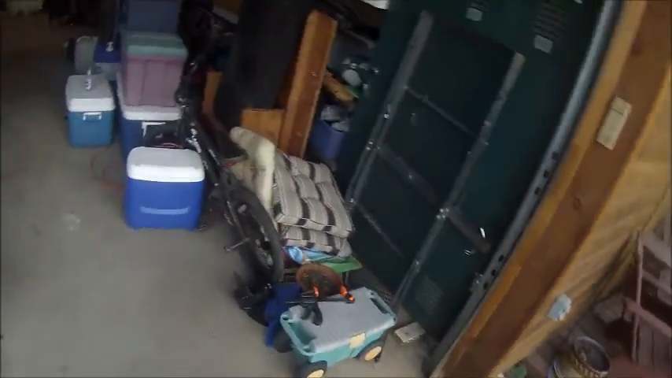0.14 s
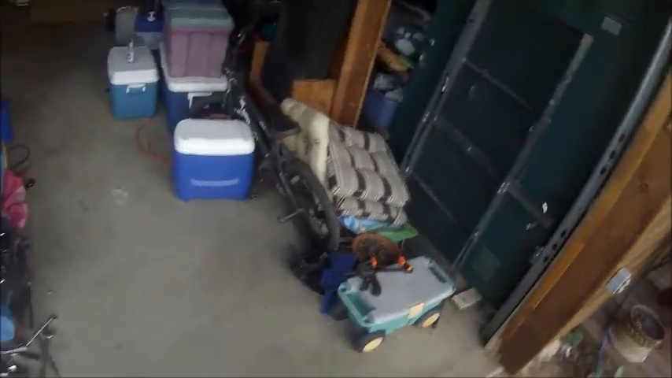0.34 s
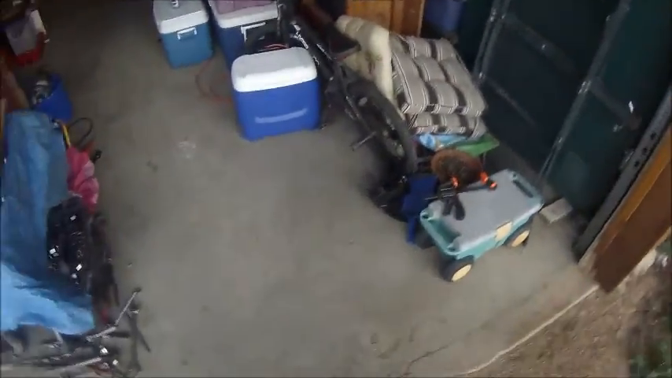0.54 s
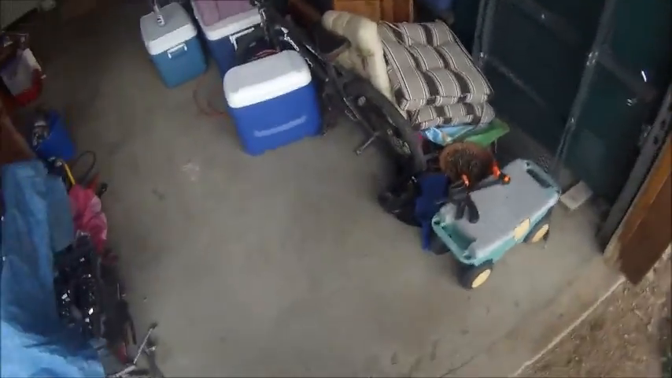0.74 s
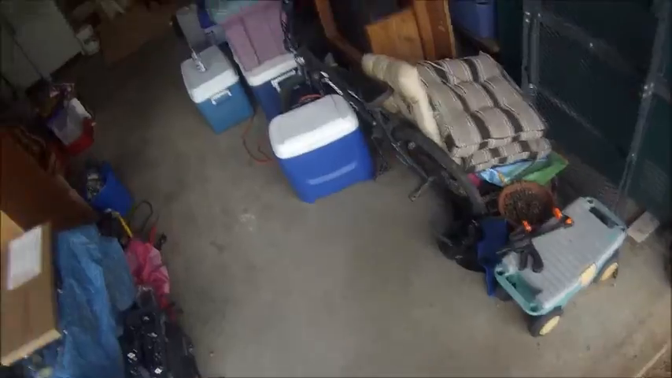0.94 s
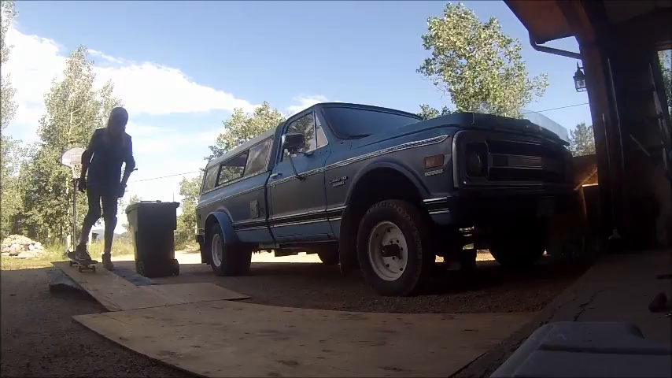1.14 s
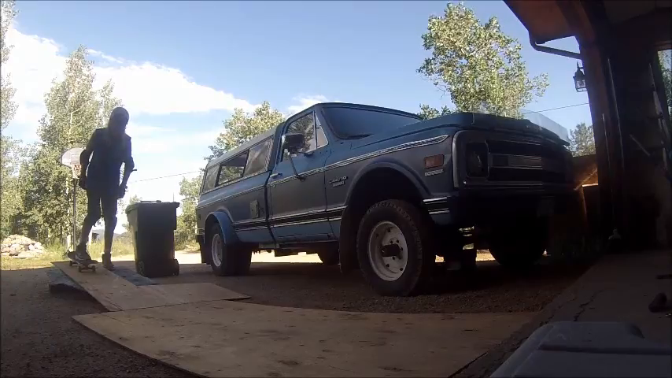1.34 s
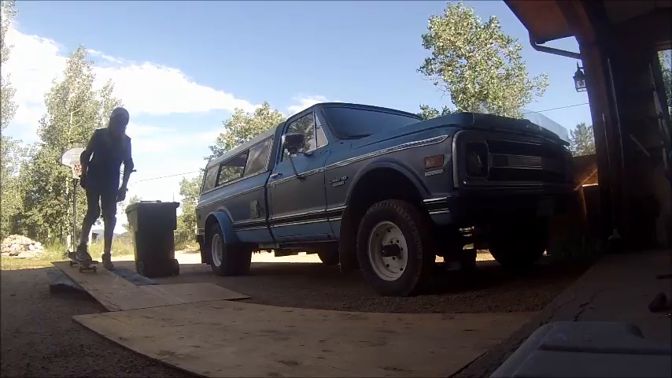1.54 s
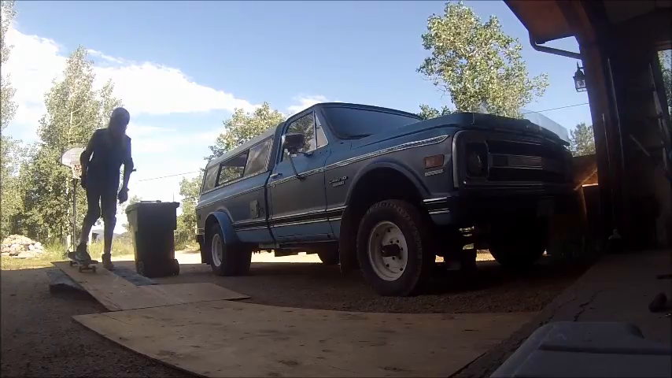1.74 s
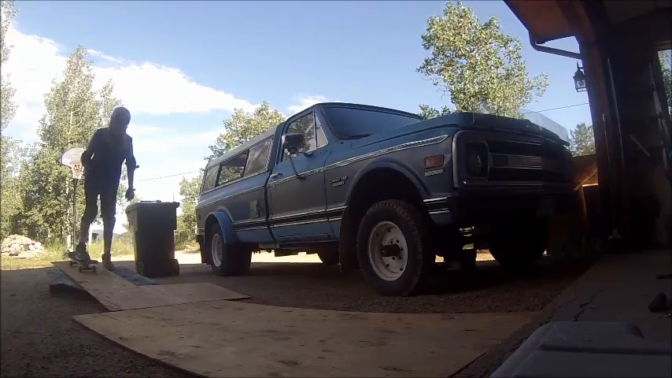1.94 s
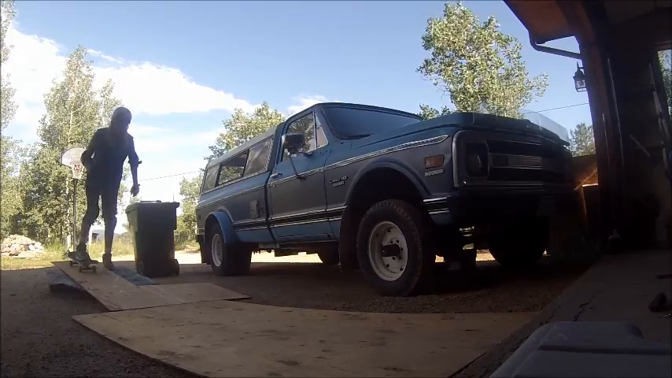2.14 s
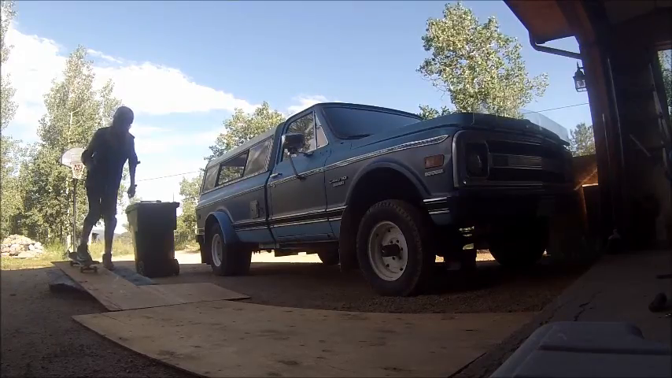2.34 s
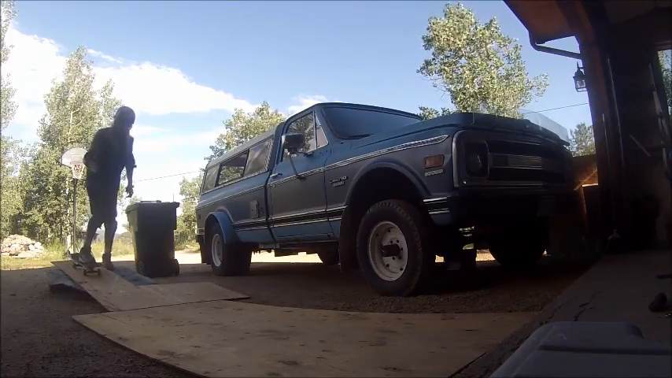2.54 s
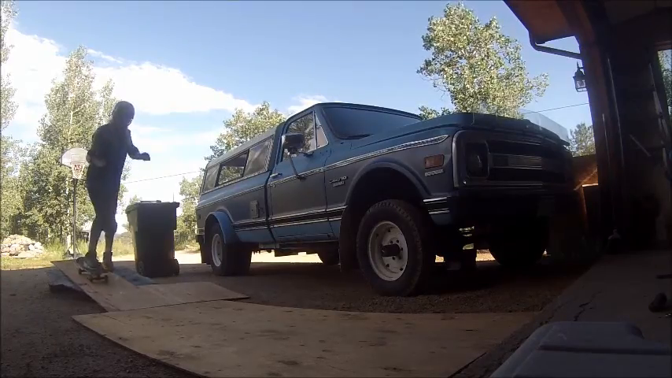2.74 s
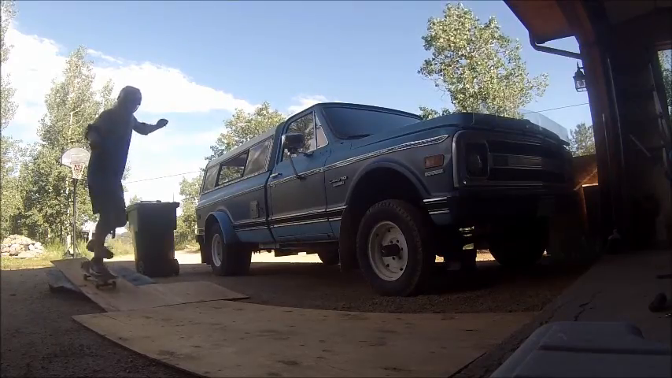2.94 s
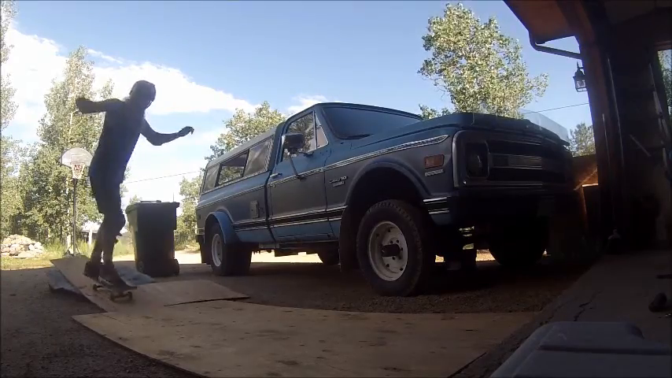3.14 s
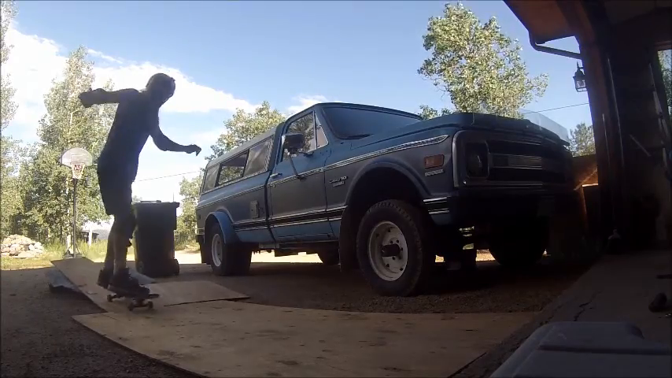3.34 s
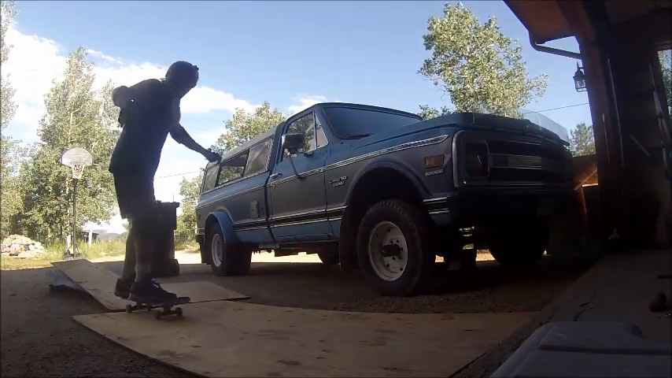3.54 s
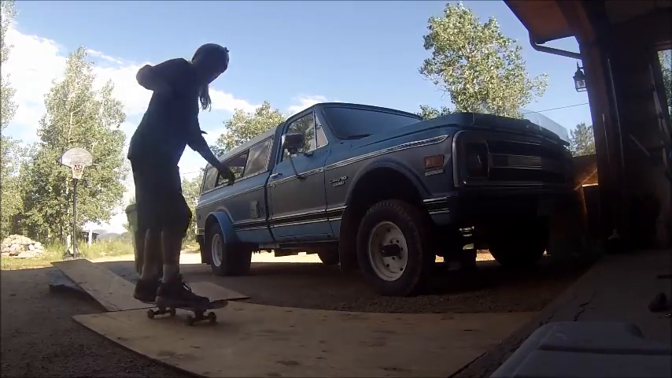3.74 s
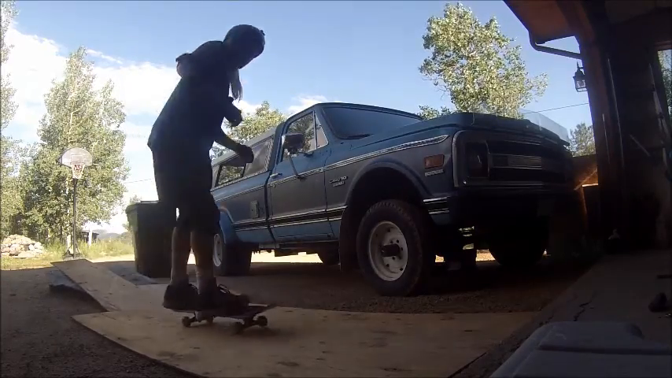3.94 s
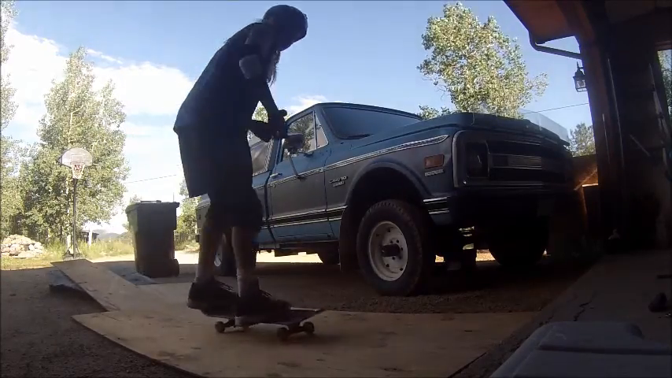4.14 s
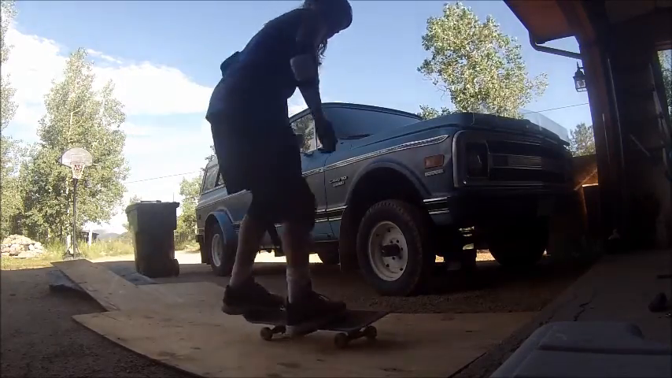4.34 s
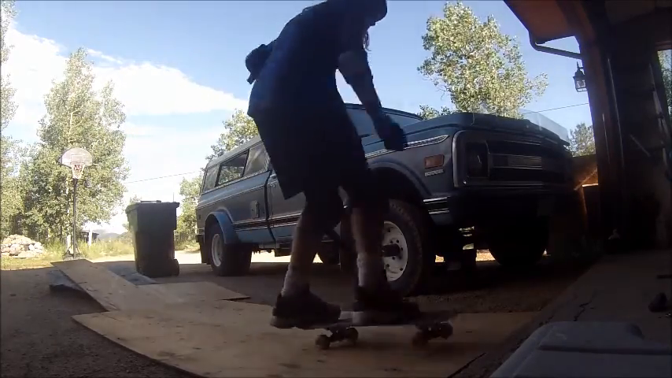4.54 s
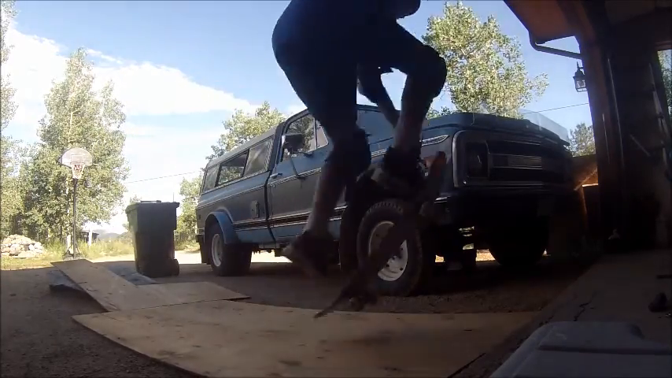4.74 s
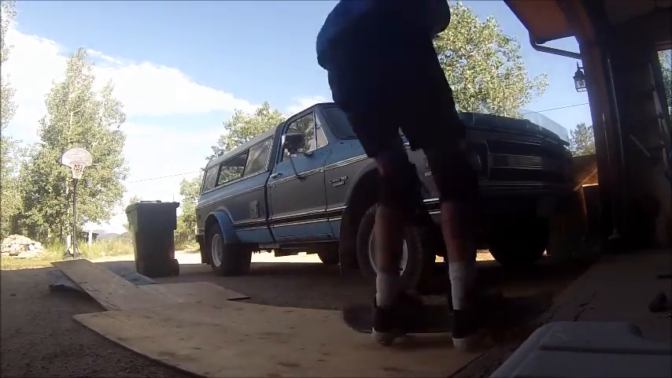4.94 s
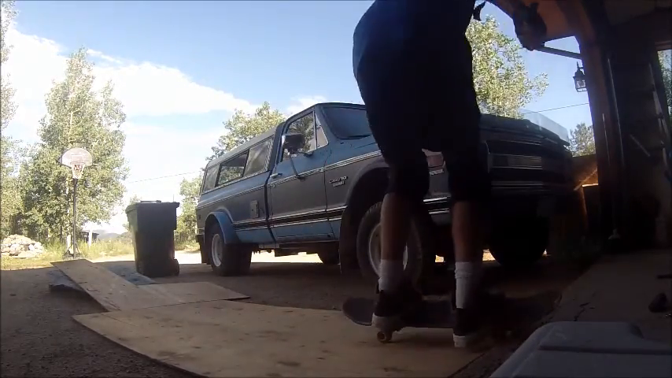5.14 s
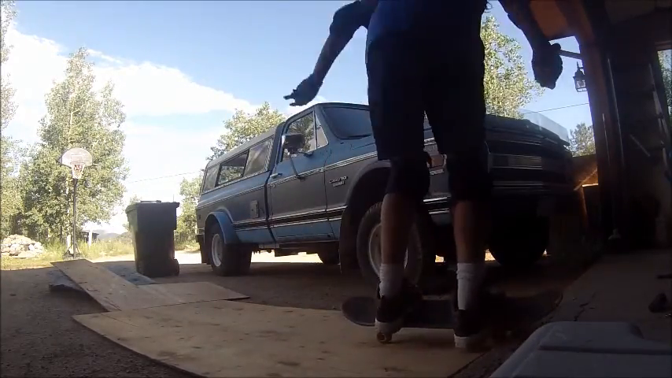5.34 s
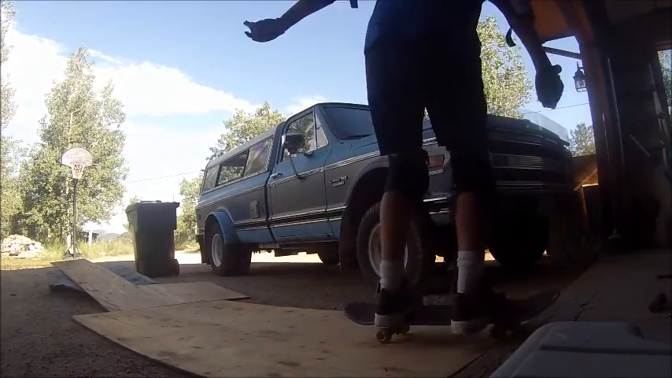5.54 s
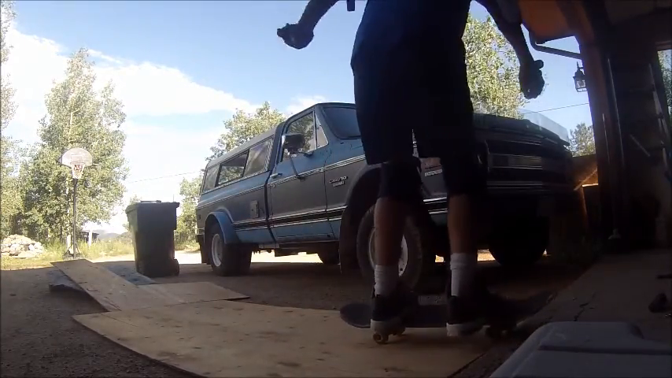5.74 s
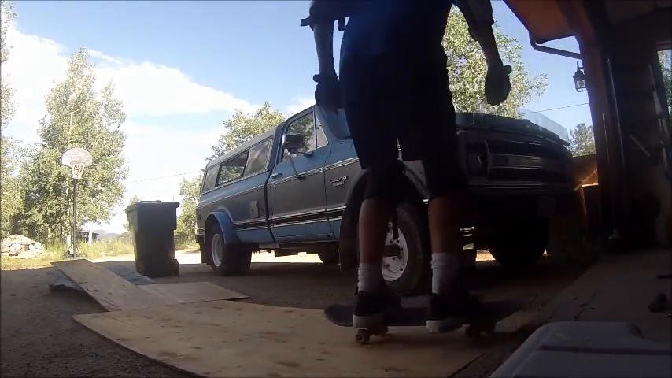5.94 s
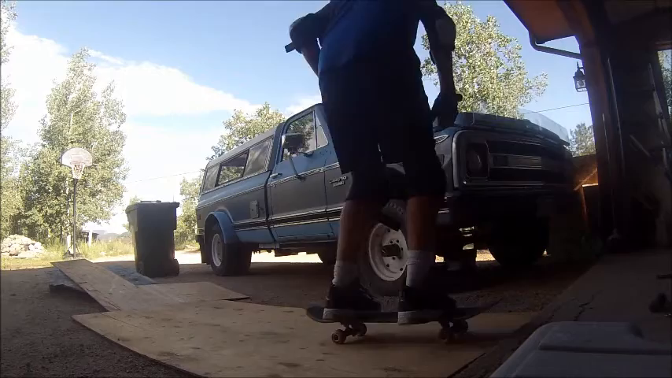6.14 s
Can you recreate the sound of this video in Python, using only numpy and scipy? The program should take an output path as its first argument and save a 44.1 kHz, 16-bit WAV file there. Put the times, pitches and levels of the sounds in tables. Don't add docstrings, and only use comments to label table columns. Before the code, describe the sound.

Right against the microphone, fingers rub a hard plastic case and snap it into its mount with loud, sharp clicks. An abrupt cut leaves soft hiss and faint insects on a driveway. A foot and skateboard clack, wheels roll and knock over loose plywood sheets, the tail pops, and the board slams down close by with a booming wooden clatter, then a few small ticks. Everything outdoors is muffled by the shut case.

```python
import sys
import numpy as np
from scipy import signal
from scipy.fft import rfft, irfft, next_fast_len
from scipy.io import wavfile
from scipy.ndimage import map_coordinates

SR = 44100
rng = np.random.default_rng(int(sys.argv[2]) if len(sys.argv) > 2 else 0)


def bounce(signal):
    frames = np.transpose(np.atleast_2d(signal))
    limited = np.clip(frames, -1, 1)
    pcm = np.round(limited * 32767).astype(np.int16)
    wavfile.write(sys.argv[1], SR, pcm)


N = 272979
TIME = np.arange(N) / SR
CUT_S = 1.0702
CUT = round(CUT_S * SR)

# pitch_hz, level_db (per Hz)
HISS_SPECTRUM = [(12, -32), (24, -1), (70, -0.5), (187, -5), (388, -9), (1060, -14.5), (2320, -18),
                 (15500, -33.5)]
# time_s, level_db
GAIN_CONTROL = [
    (0, -1),
    (.7, 2),
    (.72, -12),
    (.88, -9.5),
    (.9, -24),
    (1.07, -60.5),
    (1.08, -1.5),
    (1.2, 0),
]
# pitch_hz, width_hz, level_db
CASE_LOW = [(390, 190, 3), (553, 670, -5.5), (800, 270, 2.5)]
CASE_MID = [(1343, 130, -5.5), (1500, 300, -6.5), (2140, 270, -2), (2320, 180, 0.5), (2700, 200, -2),
            (2950, 440, -8)]
CASE_HIGH = [(3302, 620, -8.5), (4010, 87, -1), (4550, 160, -3), (5260, 120, -4.5), (6100, 170, -5)]
CASE_TOP = [(7200, 190, 1.5), (8584, 440, -5.5), (9850, 700, -0.5), (13200, 1600, -9)]
# start_s, peak_s, end_s, level_db, brightness_db
STROKES = [(-.05, 0.077, .25, -70, -0.5), (0.179, 0.201, .24, -51.5, -13.5),
           (0.193, 0.239, 0.27, -48.5, -9.5), (0.248, 0.326, 0.48, -70.5, -1),
           (0.673, 0.714, 0.82, -56.5, -15.5), (0.757, 0.825, .855, -49, -4),
           (0.852, 0.881, .893, -51, -0.5), (.87, 0.928, 1.0, -64, -8.5), (0.977, 0.989, 1.03, -52, -7),
           (0.995, 1.024, 1.05, -36.5, -1), (1.005, 1.041, 1.06, -29, 0), (1.035, 1.05, 1.062, -24, 0)]
# time_s, level_db
HAND_SHAKE = [
    (0, -56.5),
    (.17, -54),
    (.24, -38),
    (.31, -59.5),
    (.68, -57),
    (.71, -35.5),
    (.8, -52),
    (.97, -57),
    (1.052, -46),
]
# start_s, pitch_hz, level_db, t60_s, direction
JOLTS = [(.045, 44.5, -39.5, 0.083, 1), (.043, 170, -42, .06, 1), (0.196, 61.6, -25, .2, 0.46),
         (0.223, 61, -23, 0.056, 0.84), (0.237, 69.3, -25.5, 0.2, -0.93), (0.564, 28.3, -39.5, 0.87, -1.03),
         (.7116, 250, -8.5, 0.0097, -1.9), (.7116, 520, -15, 0.011, -1.1), (.712, 55.9, -17, 0.29, 0.86),
         (0.7473, 110, -17, 0.017, -1.6), (.7505, 49.5, -17, 0.2, 1), (.826, 42, -28.5, 0.19, 0.94),
         (.8854, 500, -20, 0.0055, 0.86), (.886, 58, -30.5, 0.12, -2), (.98, 35, -37.5, 0.18, 1),
         (1.0165, 800, -13.5, 0.0052, 0.61), (1.048, 47.3, -15.5, 0.23, 0.98)]
# start_s, high_peak_db, mid_db, low_db, top_db
SNAPS = [
    (0.6256, -61.5, 3, 3, -9),
    (0.7114, -8, -3, -7, -11),
    (0.7352, -32, -1, -12, -4),
    (0.7451, -13.5, -2, -8, -14),
    (0.7873, -44, -13, -22, -28),
    (0.8854, -23.5, -3, -3, -20),
    (0.9104, -57, 8, -4, -21.5),
    (1.046, -16.5, -3, -13, -13),
    (1.0505, -13, -9.5, -40, -5),
]
# start_s, pitch_hz, level_db, t60_s, direction
PANELS = [(.7118, 5940, -6, .01, -1), (.7122, 2770, -8, 0.011, -1), (.7363, 3000, -27, .012, 1),
          (.7458, 3000, -14, .012, 1), (.7125, 1400, -16, .012, 1), (.7123, 4920, -11, .014, 1),
          (.7459, 2410, -3, 0.012, 1), (.7473, 4550, -15, 0.012, -1), (.7475, 5900, -20, 0.011, 1),
          (.886, 2430, -5, 0.0054, 1), (.8871, 1610, -16, 0.0091, 1), (1.0168, 1450, -17, .004, 1),
          (1.0466, 2295, -10.5, .018, 1), (1.047, 2810, -12, 0.018, -1), (1.0495, 3990, -11, .018, -1),
          (1.0505, 4530, -14, .016, 1), (1.0505, 850, -17, 0.019, 1), (1.049, 7020, -24, .015, 1),
          (1.022, 6020, -31, 0.047, 1)]
# start_s, pitch_hz, level_db, t60_s
MOUNT_SPRING = [(.713, 5300, -27, 0.048), (.713, 4785, -31, .04), (.7465, 4610, -27, 0.03),
                (.713, 7400, -27, 0.027), (.713, 2700, -37.5, 0.1), (.747, 2137, -38, 0.12),
                (.747, 2650, -29.5, 0.051), (.747, 1845, -57, 0.46), (.887, 302, -44, 0.072),
                (.887, 1841, -52.5, .6), (.887, 2126, -51.5, 0.22), (.887, 2669, -48.5, 0.16),
                (1.052, 6100, -25.5, 0.028)]
# start_s, end_s, pitch_hz, level_db
PEEPS = [
    (.46, 0.583, 4730, -75),
    (1.32, 1.36, 11280, -77.5),
    (1.488, 1.507, 11240, -76),
    (3.033, 3.134, 5500, -78.5),
    (5.282, 5.325, 11280, -78),
]
# start_s, end_s, level_db
INSECTS = [
    (1.829, 2.12, -75),
    (2.09, 2.08, -76.5),
    (2.188, 2.3, -77),
    (2.3, 2.4, -76.5),
    (3.128, 3.3, -83),
    (3.802, 3.9, -77),
    (5.987, 6.4, -76),
    (2.45, 5.6, -80.5),
]
# pitch_hz, width_hz, level_db
WINGS = [(5700, 440, -1.5), (6220, 290, -3), (7020, 240, -4), (10910, 650, -4.5)]
# start_s, end_s, level_db
WHINE_BURSTS = [
    (3.093, 3.127, 0),
    (5.205, 5.242, -1),
]
# pitch_hz, level_db
WHINE_LINES = [(6772, -72), (11278, -80), (13534, -79)]
# pitch_hz, width_hz, level_db
PORT_MID = [(1470, 400, -7.5), (2084, 165, -2.5), (2350, 300, -6), (2638, 89, 0), (2980, 530, -12)]
PORT_HIGH = [(3650, 240, -1.5), (3990, 110, -1), (4463, 230, 2), (5270, 200, -1.5), (5560, 320, -4.5),
             (6100, 330, -6)]
PORT_TOP = [(7100, 600, -4.5), (8500, 800, -25), (10400, 770, -5)]
# pitch_hz, width_hz, level_db
WOOD = [(124, 52, 1), (220.6, 28, 3), (277, 49, -1), (332.5, 44, 2.5), (436, 77, -8.5), (637, 163, 0),
        (936, 720, -8.5), (1650, 340, -8.5)]
# time_s, deck_rumble_db
ROLL = [(2.3, -69), (2.78, -77.5), (3.33, -67.5), (3.5, -61.5), (3.69, -54), (3.75, -62.5), (3.96, -63.5),
        (4.31, -68), (4.34, -59), (4.48, -58), (4.57, -56.5), (4.63, -66), (4.69, -76), (4.94, -75),
        (5.01, -64), (5.17, -63.5), (5.55, -74.5), (6.19, -72.5)]
# pitch_hz, width_hz, level_db
DECK = [(147, 38, -0.5), (211.5, 29, 1), (292, 103, -2), (464, 490, -12)]
# start_s, peak_s, end_s, level_db
SAGS = [
    (3.423, 3.551, 3.7, -59),
    (3.546, 3.687, 3.8, -46),
    (3.601, 3.82, 4.0, -53.5),
    (4.1, 4.336, 4.4, -63),
    (4.448, 4.58, 4.75, -52.5),
    (4.65, 4.79, 4.93, -60.5),
    (4.96, 5.038, 5.13, -39.5),
    (5.003, 5.17, 5.4, -50.5),
]
# start_s, high_peak_db, mid_db, wood_db
CRACKS = [
    (2.4754, -41, 0, -23),
    (3.4444, -46.5, -4.5, -4.5),
    (4.7237, -39.5, 5, -10),
    (4.7325, -28, -6, -21.5),
    (4.7388, -32.5, -17, -23.5),
    (4.965, -30, 1, 4),
    (5.0036, -15, -9, -9.5),
]
# start_s, pitch_hz, level_db, t60_s
AXLE = [(2.478, 2620, -41, 0.042), (2.477, 5050, -50, .03), (2.549, 5000, -48, .05), (2.54, 4550, -48, .03),
        (2.55, 6100, -54, .06), (2.511, 2050, -52, .03), (2.477, 2110, -46, 0.038), (2.477, 4700, -45, .03),
        (2.543, 2640, -40.5, 0.097), (2.543, 2080, -43.5, 0.086), (2.548, 4630, -45, 0.06),
        (2.58, 3920, -57, 0.15), (5.0045, 4550, -23, .025), (4.734, 4580, -30.5, 0.033),
        (2.79, 2050, -57, .05), (2.79, 1350, -57, .03), (2.826, 2600, -58, .08), (2.835, 2050, -59, .05),
        (2.876, 2050, -57, .05), (2.876, 2500, -59, .05), (3.2, 4500, -59, .05), (3.195, 2550, -59, .05)]
# start_s, high_peak_db
TICKS = [(2.5074, -47), (2.526, -42), (3.5113, -50), (3.572, -46), (3.72, -45.5), (4.4026, -45),
         (4.4925, -47.5), (4.588, -44.5), (4.628, -46), (5.3204, -45), (5.5472, -47.5), (5.7552, -51),
         (5.875, -55.5)]
# mid_db, wood_db, top_db, t60_s
TICK_SHAPE = (-13, -27, -25.5, -0.03)
# start_s, high_peak_db, mid_db
STEPS = [
    (2.5357, -42.5, -5),
    (2.5437, -45.5, 0),
    (2.5483, -41, -5.5),
    (2.5758, -53.5, 2.5),
    (2.651, -62, 7),
    (2.7808, -49.5, -7.5),
    (2.8095, -55, -8),
    (2.8742, -58, 2.5),
]
# start_s, high_peak_db, mid_db, wood_db
EDGES = [(3.125, -55.5, -14, 0.5), (3.1792, -53, -2.5, -9.5), (3.4543, -49, 1.5, 3),
         (3.4628, -44.5, -7, -11), (3.5955, -35, -4, -4), (3.6886, -55.5, 4.5, -3.5),
         (3.9648, -59, -5, 3.5), (4.0963, -54.5, -22.5, 9), (4.23, -50.5, -5.5, -20),
         (4.3121, -49.5, -9.5, -23.5), (4.334, -63, -12.5, 12.5), (4.5032, -47, -10, 6),
         (5.63, -71, -1.5, 13.5)]
# start_s, pitch_hz, level_db, t60_s
THUDS = [(3.597, 286, -38, 0.25), (3.597, 346, -32, 0.12), (3.596, 470, -34, 0.06), (3.597, 614, -40, 0.15),
         (3.6, 680, -40, .15), (3.596, 1615, -32, 0.026), (3.6, 205, -43, 0.35), (3.6259, 346, -34, .08),
         (3.456, 684, -45, .1), (3.465, 300, -42, .05), (3.5, 300, -47, .05), (4.096, 200, -49, .15),
         (4.104, 370, -45, 0.08), (4.095, 810, -46, .03), (4.502, 200, -43, .12), (4.505, 350, -48, .1),
         (4.505, 668, -49, .09), (4.41, 205, -51, .12), (4.735, 240, -53, 0.085), (4.7, 208, -45.5, 0.3),
         (4.963, 337.5, -26, 0.21), (5.006, 125, -23, 0.22), (5.01, 94, -25, 0.095),
         (5.008, 330, -34, 0.11)]
# start_s, pitch_hz, level_db, t60_s, direction
SLAPS = [(4.9652, 700, -17, .012, 1), (4.9885, 300, -20, .03, 1), (4.9955, 5200, -23, .02, 1),
         (5.0042, 4950, -10, .012, -1), (5.007, 4300, -24, .02, 1), (3.4525, 1490, -43, .03, 1),
         (5.0075, 230, -16, 0.027, -0.94), (5.0097, 260, -13.5, 0.018, 0.89), (5.0163, 900, -15.5, .012, 1),
         (5.0205, 450, -18, .015, 1), (4.7245, 2055, -33, .04, 1), (4.7336, 5160, -35, .03, 0.88),
         (4.7336, 2670, -36, .05, 1), (4.5046, 4450, -48, .02, 1), (4.6019, 2550, -51, .04, 1),
         (4.6283, 4510, -46, 0.063, 0.95), (4.6283, 2550, -52, .07, 0.84), (4.2177, 4550, -52.5, .04, 1),
         (4.2322, 4550, -50, .03, 0.85), (4.2322, 2610, -50.5, .04, 0.9), (4.233, 1610, -51, 0.039, 0.97),
         (4.312, 4500, -52.5, .03, 0.97), (4.5655, 4500, -56.5, .03, 1), (4.4462, 4500, -59, 0.019, 1)]
# start_s, high_peak_db, mid_db
SCUFFS = [
    (4.2083, -53, -7.5),
    (4.6008, -47.5, -10),
    (4.6273, -46, -4),
]
# start_s, high_peak_db, mid_db, wood_db, t60_s
LANDING = [(4.961, -23.5, -0.5, -4, 0.038), (4.9751, -23, -2.5, -12, 0.034), (4.9854, -24.5, -8, -3, 0.036),
           (4.9947, -23, -4, -6, 0.014), (5.0078, -26.5, 2.5, 5.5, 0.03), (5.0164, -27, -3, 2.5, 0.072),
           (5.0299, -29.5, -3.5, -4.5, 0.098), (5.046, -33, -2, -3, .05), (5.085, -40, 0, -2, .05),
           (5.11, -46, 1, -2, .05), (5.155, -53, 2, 0, .04)]


def amp(db):
    return 10 ** (np.asarray(db, float) / 20)


def unit(x):
    return x / np.sqrt(np.mean(x ** 2) + 1e-20)


def curves(rows):
    times, *columns = np.transpose(rows)
    return [np.interp(TIME, times, column) for column in columns]


def wobble(rate):
    knots = rng.standard_normal(int(N * rate / SR) + 4)
    return map_coordinates(knots, [TIME * rate])


def span(start, end, edge=0.0026):
    return np.clip(np.minimum(TIME - start, end - TIME) / edge, 0, 1)


def swell(start, peak, end, db):
    away = np.where(TIME < peak, (TIME - peak) / (peak - start), (TIME - peak) / (end - peak))
    return amp(db - 27.5 * away ** 2)


def grit(size_db):
    return unit(rng.standard_normal(N) * amp(size_db * wobble(500)))


def resonate(x, modes, damping=1):
    m = next_fast_len(len(x) + SR // 4)
    f = np.fft.rfftfreq(m, 1 / SR)
    h = 0
    for k, (hz, width, db) in enumerate(modes):
        h = h + (-1) ** k * amp(db) * 1j * f * width / (hz * hz - f * f + 1j * f * width * damping)
    return irfft(rfft(x, m) * h / np.sqrt(np.mean(np.abs(h) ** 2)), m)[:len(x)]


def ringing(rows, rise):
    out, t = np.zeros(N + SR), np.arange(SR // 2) / SR
    for s, hz, db, t60, *direction in rows:
        ring = amp(db - 60 * t / t60) * np.sin(2 * np.pi * hz * t) * (1 - np.exp(-t / rise))
        out[round(s * SR):][:len(t)] += np.prod(direction) * ring * (1 - t / t[-1])
    return out[:N]


def knocks(table, offsets_db, tails_db, tails_t60, lengths, rise, step):
    t = np.arange(SR // 3) / SR
    echoes = amp(np.array(tails_db)[:, None] - 60 * t / np.array(tails_t60)[:, None]) * (1 - t / t[-1])
    lumps = np.pad(amp(2.1 * wobble(250)), (0, SR))
    steps = step * np.sqrt(SR / np.array([3720, 2000, 1000, 8000]))
    drive = np.zeros((4, N + SR))
    for s, db, mid_db, low_db, top_db, t60 in table:
        start = round((s + 0.0004) * SR)
        blow = amp(-60 * t / (max(t60, .002) * np.array(lengths)[:, None]))
        envelope = (blow + echoes * lumps[start:][:len(t)]) * (1 - np.exp(-t / rise))
        force = envelope * rng.standard_normal((4, len(t)))
        force[:, round(3 * rise * SR)] -= steps
        level = amp(db + np.array([0, mid_db, low_db, top_db]) + offsets_db)[:, None]
        drive[:, start:][:, :len(t)] += level * force
    return drive[:, :N]


def hiss():
    hz, db = np.transpose(HISS_SPECTRUM)
    m = next_fast_len(N + SR // 2)
    f = np.fft.rfftfreq(m, 1 / SR)
    response = unit(amp(np.interp(np.log(f + 1), np.log(hz), db)))
    noise = irfft(rfft(rng.standard_normal(N), m) * response, m)[:N]
    return amp(-62 + curves(GAIN_CONTROL)[0] + 0.13 * wobble(8.3)) * noise


def rubbing():
    strokes = np.array([swell(*row[:4]) for row in STROKES])[:, :CUT] + 1e-7
    total = strokes.sum(0)
    stroke_db = 20 * np.log10(total)
    bright_db = np.array(STROKES)[:, 4] @ strokes / total
    rub = resonate(grit(.8)[:CUT] * amp(stroke_db), CASE_MID)
    rub += resonate(grit(1.9)[:CUT] * amp(stroke_db + bright_db), CASE_HIGH)
    rub += resonate(grit(2.9)[:CUT] * amp(stroke_db + 1.2 * bright_db - 9), CASE_TOP)
    rub += resonate(grit(2.4)[:CUT] * amp(stroke_db - .4 * bright_db - 17), CASE_LOW)
    rub += resonate(grit(1.3)[:CUT] * amp(stroke_db - .9 * bright_db - 13), [(1510, 350, 0)])
    return rub


def hand_shake():
    tremor = resonate(rng.standard_normal(CUT), [(25, 33, 4.5), (69.48, 41, -10), (175, 53, -14.5)])
    return amp(curves(HAND_SHAKE)[0][:CUT]) * tremor


def snaps():
    forces = knocks([(*row, 0.019) for row in SNAPS],
                    offsets_db=[-6, -1.5, -0.5, -7.5], tails_db=[-23.5, -25.5, -29.5, -29.5],
                    tails_t60=[0.014, 0.038, 0.042, .035], lengths=[0.71, 0.98, 1.1, 1.3],
                    rise=0.00022, step=1.9)
    groups = (CASE_HIGH, CASE_MID, CASE_LOW, CASE_TOP)
    clicks = sum(resonate(f[:CUT], modes, damping=2.1) for f, modes in zip(forces, groups))
    return clicks + ringing(PANELS, rise=.0002)[:CUT] + ringing(MOUNT_SPRING, rise=0.00085)[:CUT]


def handling():
    held = rubbing() + hand_shake() + ringing(JOLTS, rise=0.0003)[:CUT] + snaps()
    soft_top = signal.butter(2, 10500, fs=SR, output="sos")
    held = signal.sosfilt(soft_top, held)
    return np.pad(held, (0, N - CUT)) * span(-1, CUT_S, edge=0.001)


def peeps():
    return sum(amp(db + 1.5 * wobble(40)) * span(start, end) * np.sin(2 * np.pi * hz * TIME)
               for start, end, hz, db in PEEPS)


def insects():
    spells = sum(amp(db) * span(start, end, edge=0.0066) for start, end, db in INSECTS)
    return spells * amp(1.2 * wobble(33)) * resonate(rng.standard_normal(N), WINGS)


def electric_whine():
    partials = sum(amp(db + 6) * np.sin(2 * np.pi * hz * TIME) for hz, db in WHINE_LINES)
    return partials * sum(amp(db) * span(start, end) for start, end, db in WHINE_BURSTS)


def rolling():
    rumble_db, = curves(ROLL)
    bearing_db = -74 + 0.376 * (rumble_db + 65.5)
    present = span(2.31, 7, edge=0.088)
    bearings = resonate(present * grit(2.7) * amp(bearing_db - 1.1), PORT_HIGH)
    bearings += resonate(present * grit(4.5) * amp(bearing_db), PORT_MID)
    rumble = resonate(grit(2.5) * amp(rumble_db + 1.35 * wobble(27)), DECK)
    sway = np.cumsum(53.6 * (1 + 0.0812 * wobble(7.8))) / SR
    flex = sum(swell(*row) for row in SAGS) * amp(0.53 * wobble(7.8)) * np.sin(2 * np.pi * sway)
    return bearings + present * (rumble + flex)


def top_share(db):
    return -17 - 0.39 * (db + 55)


def crack_forces():
    return knocks([(*row, top_share(row[1]) + 2, 0.022) for row in CRACKS],
                  offsets_db=[-4, -3, -2.5, 1], tails_db=[-20, -13.5, -9.5, -17],
                  tails_t60=[0.27, 0.39, 0.52, .27], lengths=[0.53, 1.43, 4, .7], rise=0.00041, step=0.2)


def tick_forces():
    return knocks([row + TICK_SHAPE for row in TICKS],
                  offsets_db=[-2, -3, 2, -4.5], tails_db=[-16.5, -29, -21, -24],
                  tails_t60=[0.11, .2, .2, .2], lengths=[1.4, 1.1, 1.1, 1.1], rise=0.00048, step=0.48)


def blow_forces():
    rows = [(s, db, mid, -69.5 - db, 0.036) for s, db, mid in STEPS]
    rows += [(*row, 0.033) for row in EDGES]
    rows += [(*row, -14.5, 0.12) for row in SCUFFS]
    rows += LANDING
    return knocks([(s, db, mid, wood, top_share(db), t60) for s, db, mid, wood, t60 in rows],
                  offsets_db=[-9.5, -2.5, -3.5, -0.5], tails_db=[-16, -12, -9, -6.5],
                  tails_t60=[0.7, 0.56, 0.47, 0.58], lengths=[1.85, 1.03, 2.23, .9], rise=0.001, step=0.34)


def skateboard():
    forces = crack_forces() + tick_forces() + blow_forces()
    groups = (PORT_HIGH, PORT_MID, WOOD, PORT_TOP)
    clatter = sum(resonate(f, modes) for f, modes in zip(forces, groups))
    rings = ringing(AXLE, rise=0.0017) + ringing(SLAPS, rise=0.00048) + ringing(THUDS, rise=0.0022)
    case_wall = signal.butter(2, 7500, fs=SR, output="sos")
    return signal.sosfilt(case_wall, rolling() + clatter + rings)


def scene():
    return (hiss() + handling() + peeps() + insects() + electric_whine() + skateboard())[None]


def roll_off(x):
    return signal.sosfilt(signal.butter(12, 16570, fs=SR, output="sos"), x)


def record(dry):
    band_limit = signal.ellip(8, .5, 60, 15020, fs=SR, output="sos")
    limited = signal.sosfilt(band_limit, dry)
    clipped = limited / (1 + np.abs(limited) ** 12) ** (1 / 12)
    return roll_off(clipped)


dry = scene()
out = record(dry)
bounce(out)
```